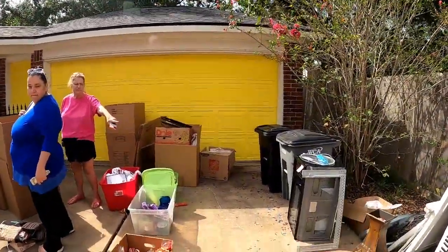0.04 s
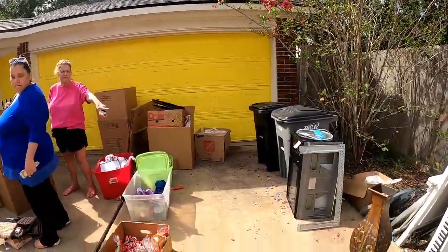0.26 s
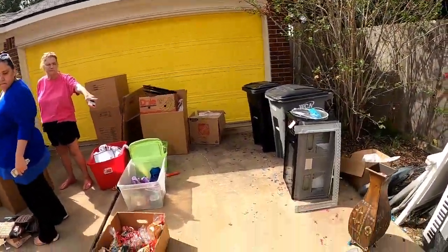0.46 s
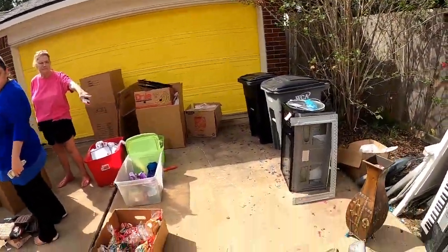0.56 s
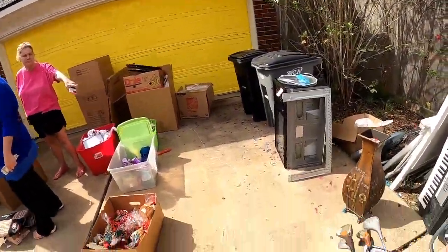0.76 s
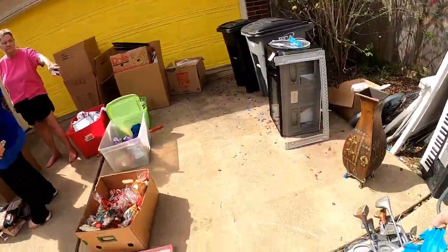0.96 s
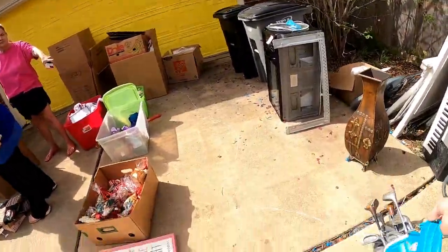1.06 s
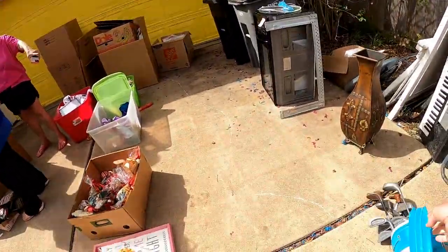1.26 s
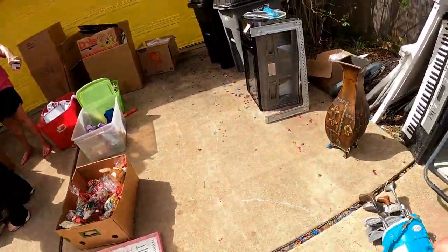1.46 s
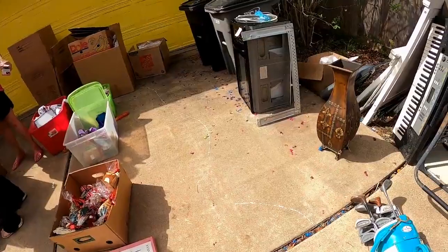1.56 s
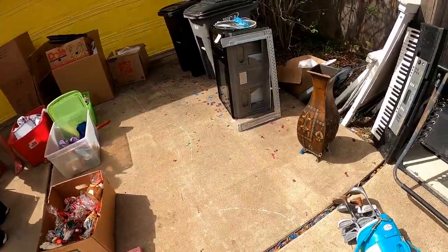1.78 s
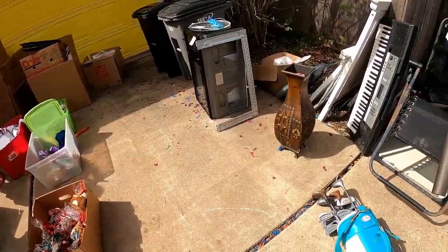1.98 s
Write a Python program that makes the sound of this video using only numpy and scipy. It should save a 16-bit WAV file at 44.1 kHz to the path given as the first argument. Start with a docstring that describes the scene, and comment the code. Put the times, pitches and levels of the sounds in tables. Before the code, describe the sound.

A bag of metal golf clubs is dragged and tipped onto concrete, close by and slightly right. First, shoes thud and scuff on grit around 0.2 and 0.7 seconds. From 0.8 seconds the bag scrapes and bumps with light clinks. At about 1.25 seconds it lands with hollow thumps and a loud, ringing clatter. The clubs rattle, knock again near 1.55 and settle by 1.7, over a quiet outdoor rumble.

```python
"""A golf bag full of metal clubs is dragged and tipped onto a concrete driveway, just to the right.
The bag scrapes along in tiny jerks, bumps, then lands with dull thumps that ring its hollow tube.
The clubs inside knock together, ring, rattle and settle. Shoes thud, scuff and snap bits of grit.
A garage and a fence give short echoes over a quiet outdoor rumble, faint hisses and a far-off hum."""
import sys
import numpy as np
from scipy import signal
from scipy.fft import rfft, irfft
from scipy.io import wavfile

SR = 44100
rng = np.random.default_rng(int(sys.argv[2]) if len(sys.argv) > 2 else 0)


def output_pcm(signal):
    """Save a mono or channel-first signal as 16-bit PCM at the path in sys.argv[1].

    Samples are clipped to [-1, 1] before scaling.
    """
    pcm = np.clip(np.atleast_2d(signal).T, -1, 1) * 32767
    wavfile.write(sys.argv[1], SR, np.round(pcm).astype(np.int16))


N = 89214

# How loudly the bag scrapes. Each row: time in seconds, level in dB.
DRAG_LEVELS = [(0, -35.5), (.05, -55.5), (.16, -45.5), (.28, -64), (.50, -64.5), (.55, -69), (.70, -67),
               (.73, -43.5), (.78, -41.5), (.87, -31.5), (.96, -27), (1.06, -25.5), (1.13, -27.5),
               (1.21, -28.5), (1.26, -33), (1.31, -24.5), (1.42, -33), (1.58, -32), (1.66, -45),
               (1.72, -61.5), (2.02, -68.5)]
# The bag's dull tone. Each row: frequency in Hz, level in dB.
BAG_TONE = [(30, -53.5), (70, 6), (130, 2.5), (280, 0), (450, 0.5), (800, -14), (1150, -11), (1600, -17.5),
            (2300, -32), (4000, -37), (7000, -47.5), (10000, -54), (15000, -73)]
# Bumps of the bag and the shafts inside. Each row: start in seconds, level in dB, pitch in Hz.
BAG_BUMPS = [(0.761, -22.5, 487), (0.79, -29, 526), (0.83, -22, 170), (.904, -14.5, 720), (.957, -14, 420),
             (0.973, -24.5, 230), (0.985, -18.5, 380), (1.018, -9, 330), (1.040, -9, 420), (1.051, -8, 150),
             (1.055, -14.5, 330), (1.073, -17.5, 240), (1.084, -13, 125), (1.097, -19.5, 400),
             (1.222, -8.5, 560), (1.23, -7, 290), (1.239, -6.5, 250), (1.243, -5, 115), (1.2577, -1.5, 285),
             (1.2648, -2.5, 310), (1.278, -14.5, 260), (1.284, -7, 330), (1.33, -14, 290),
             (1.335, -49, 200), (1.352, -19, 380), (1.405, -33.5, 480), (1.55, -19, 380), (1.568, -18, 680),
             (1.5703, -12.5, 405), (1.572, -15.5, 115.7), (1.586, -26.5, 260), (1.623, -30.5, 155),
             (1.861, -42, 242)]
# Notes of the hollow bag. Each row: pitch in Hz, width as a share of that pitch, level in dB.
BAG_NOTES = [(126, 0.067, -3.5), (220.4, 0.12, -9.5), (282.8, .08, -8.5), (454.4, 0.017, -16)]
# Fabric rasping on concrete. Each row: start in seconds, length in seconds, level in dB.
FABRIC_RASPS = [(0.803, .03, -51.5), (0.927, .025, -41), (1.042, .04, -47.5), (1.495, .03, -36)]
# The tone of that rasp. Each row: frequency in Hz, level in dB.
FABRIC_TONE = [(500, -8.5), (1500, 6), (4500, -7.5), (7000, -9.5), (10000, -9.5), (15000, -27)]

# Club heads and shafts knocking together. Each row: start in seconds, level in dB, pitch in Hz.
CLUB_CLACKS = [(.797, -46, 4100), (.8535, -30.5, 2710), (.8545, -31, 4590), (.876, -38.5, 2780),
               (.905, -34.5, 1150), (.931, -32.5, 1620), (.942, -33.5, 5000), (1.053, -34.5, 3660),
               (1.102, -38, 3070), (1.221, -19.5, 4330), (1.223, -16, 1020), (1.2265, -15.5, 2440),
               (1.230, -15.5, 1000), (1.238, -16, 1110), (1.243, -19.5, 4200), (1.247, -9, 3970),
               (1.2495, -23, 4280), (1.2525, -16.5, 4900), (1.258, -17, 4240), (1.263, -37, 2800),
               (1.270, -21, 3940), (1.278, -20.5, 4530), (1.292, -20, 4400), (1.305, -26, 4970),
               (1.312, -22.5, 3780), (1.327, -22, 2050), (1.329, -27, 1185), (1.332, -22, 3980),
               (1.338, -24, 3600), (1.371, -22.5, 3900), (1.405, -27, 1390), (1.437, -28.5, 3600),
               (1.470, -29, 3660), (1.479, -38.5, 8870), (1.4945, -21, 3620), (1.506, -45, 4600),
               (1.532, -36, 4150), (1.567, -29, 2750), (1.570, -25, 870), (1.597, -36, 4300),
               (1.650, -52.5, 2700), (1.653, -50.5, 8140), (1.719, -48.5, 9000)]
# The notes a struck club rings with. Each row: pitch in Hz, level in dB.
CLUB_NOTES = [(1018, 5), (1103, 0.5), (1242, -1.5), (1427, -5), (1569, -3), (2020, -18), (2692, -2),
              (2826, -9), (3435, -15), (3677, -1.5), (4080, -2.5), (4287, -16), (4405, -9), (5112, -4)]
# How loudly the loose clubs rattle. Each row: time in seconds, level in dB.
RATTLE_LEVELS = [(.75, -67), (.92, -52), (1.06, -47), (1.20, -48.5), (1.25, -25.5), (1.30, -33.5),
                 (1.37, -36), (1.45, -45.5), (1.51, -37.5), (1.56, -51), (1.62, -53), (1.70, -76),
                 (1.8, -80.5)]
# The tone of metal hitting metal. Each row: frequency in Hz, level in dB.
METAL_TONE = [(300, -4.5), (1000, 0), (1600, 2.5), (2200, -0.5), (3100, -4), (4000, -5), (5500, -8.5),
              (7000, -14.5), (9000, -19), (12000, -37), (15000, -45)]

# Heels landing. Each row: start in seconds, level in dB, pitch in Hz.
FOOTFALLS = [(.106, -31, 372), (.147, -28, 380), (0.1734, -16, 445), (0.7203, -20, 494)]
# The tone of a sole on concrete. Each row: frequency in Hz, level in dB.
SCUFF_TONE = [(150, -1), (500, 3), (1000, -3), (1900, -3), (2800, -9.5), (4500, -11), (6500, -18),
              (9000, -21.5), (15000, -45)]
# Grit snapping under shoes. Each row: start in seconds, level in dB, pitch in Hz.
GRIT_SNAPS = [(0.018, -33, 3404), (0.13, -42.5, 2340), (0.1731, -38, 3970), (0.1972, -24.5, 1800),
              (0.226, -39, 3300), (0.315, -51.5, 2000), (.484, -43.5, 1300), (0.717, -42, 1450),
              (0.743, -43, 3400), (1.847, -56, 1614)]
# The tone of crunching grit. Each row: frequency in Hz, level in dB.
CRUNCH_TONE = [(500, 3.5), (2000, 8.5), (6000, -15), (9000, -15.5), (15000, -34)]

# The tone of the yard's echoes. Each row: frequency in Hz, level in dB.
ECHO_TONE = [(40, -21), (250, -13.5), (600, 2.5), (1500, 9.5), (5000, 9), (12000, 5)]
# The tone of the outdoor rumble. Each row: frequency in Hz, level in dB.
RUMBLE_TONE = [(20, -7), (45, 0.5), (75, 4.5), (130, -3), (250, -15), (600, -25.5), (1300, -28),
               (3000, -65), (15000, -87)]
# The tone of the thin, airy noise above it. Each row: frequency in Hz, level in dB.
AIR_TONE = [(200, 9), (600, -1), (1300, -1), (2100, -6), (2700, -8), (4000, -22), (5300, -11), (8000, -19),
            (10000, -32.5), (15000, -41.5)]
# How the airy noise rises and falls against the rumble. Each row: time in seconds, change in dB.
AIR_CHANGES = [(0, 12.5), (.28, -1), (.5, 5), (.55, -2), (.7, -2), (1.7, 3), (1.85, -0.5), (2.02, -3)]
# How loud rumble and air are together. Each row: time in seconds, level in dB.
OUTDOOR_LEVELS = [(0, -47.5), (.5, -49.5), (1.0, -43.5), (1.7, -53.5), (2.02, -51.5)]
# Thin, distant hisses. Each row: start in seconds, length in seconds, level in dB, pitch in Hz.
FAR_HISSES = [(0, 0.18, -64, 5070), (0, 0.14, -71, 7540), (.32, 0.16, -67.5, 4900),
              (0.441, 0.1, -63.5, 5040), (0.789, 0.11, -57.5, 5800), (.80, 0.12, -58, 7300),
              (1.703, 0.19, -69.5, 7520)]

CLUB_FADE_S, CLUB_DETUNE = 0.11, 0.0031  # time to fade by 60 dB; tuning spread as a share of the pitch
LEFT_LAG_S, CLUB_LAG_SPREAD_S = 4.8e-5, 4e-5  # how late the left side hears; how that varies by club


def bag():
    """The bag scrapes along in small jerks; each bump shakes its contents and rings the hollow tube."""
    body = unit(colour(grains(1100, spread_db=3.76), BAG_TONE)) * swell(DRAG_LEVELS)
    for start, db, hz in BAG_BUMPS:
        shake = undb(-11) * colour(burst(decay_s=0.0071), BAG_TONE)
        add(body, start, undb(db) * (thump(hz, cycles=1.3) + shake))
    hollow = sum(undb(db) * band(body, hz, width) for hz, width, db in BAG_NOTES)
    out = undb(-1.5) * body + hollow
    for start, length, db in FABRIC_RASPS:
        n = int(length * SR)
        rasp = unit(colour(grains(4500, spread_db=4), FABRIC_TONE))[:n]
        add(out, start, undb(db) * rasp * np.linspace(1, 0, n))
    low_cut = signal.butter(2, 105, "high", fs=SR, output="sos")  # weakens bass below 105 Hz
    return signal.sosfilt(low_cut, out)


def club_clacks(crack_s=0.0018, ping_s=0.001):
    """Single knocks between clubs: a crack, a short ping and a ring of the notes near that pitch."""
    out, t = np.zeros(N), clock()[:SR // 5]
    for start, db, hz in CLUB_CLACKS:
        ping = undb(-4) * np.sin(2 * np.pi * hz * t) * np.exp(-t / ping_s)
        contact = snap(hz, width=0.3, decay_s=crack_s)
        crack = undb(-7.5) * colour(burst(crack_s), METAL_TONE)
        ring = undb(-26.5) * band(club_ring(scatter_db=-6.5), hz, width=0.8)
        add(out, start, undb(db) * (contact + ping + crack))
        add(out, start, undb(db) * ring)
    return out


def club_rattle(count=3):
    """Loose clubs chatter in light taps, each club with its own ring and direction."""
    out = 0
    for place in np.linspace(-1, 1, count):
        taps = grains(350, spread_db=1.33) * swell(RATTLE_LEVELS) / np.sqrt(count)
        ring = club_ring(scatter_db=3.5)
        ringing = signal.fftconvolve(taps, ring / np.linalg.norm(ring))[:N]  # every tap starts a ring
        chatter = colour(taps, METAL_TONE) + undb(-6.5) * ringing
        out = out + from_right(chatter, LEFT_LAG_S + place * CLUB_LAG_SPREAD_S)
    return out


def club_ring(scatter_db):
    """One club rings with many notes at once; each club is tuned and struck a little differently."""
    t = clock()[:SR // 2]
    ring = 0
    for hz, db in CLUB_NOTES:
        strength, tuning, phase = rng.standard_normal(3)
        pitch = hz * (1 + CLUB_DETUNE * tuning)
        ring = ring + undb(db + scatter_db * strength) * np.sin(2 * np.pi * (pitch * t + phase))
    return ring * fade(t, CLUB_FADE_S)


def shoes(slide_peak_s=0.1964, rise_s=0.013, fall_s=0.017):
    """One sole slides over the concrete, heels land and grit snaps."""
    t = clock() - slide_peak_s
    slide = np.exp(-np.where(t < 0, (t / rise_s) ** 2, t / fall_s))
    grit = grains(4500, spread_db=2.2)
    rasp = unit(colour(grit, SCUFF_TONE))
    rasp += undb(-15) * unit(band(grit, hz=2100, width=0.3, order=2))
    rasp += undb(-12.5) * unit(band(grit, hz=2910, width=0.06))
    out = undb(-33) * rasp * slide
    for start, db, hz in FOOTFALLS:
        scuff = undb(-20.5) * colour(burst(decay_s=0.014), SCUFF_TONE)
        add(out, start, undb(db) * (thump(hz, cycles=0.68) + scuff))
    for start, db, hz in GRIT_SNAPS:
        crack = snap(hz, width=0.26, decay_s=0.0012)
        crunch = undb(-3) * colour(burst(decay_s=0.002), CRUNCH_TONE)
        add(out, start, undb(db) * (crack + crunch))
    return out


def echoes(x, fade_s=0.13, build_s=0.0017):
    """Sound bounces back as many tiny echoes, different on the left and right."""
    t = clock()
    shape = fade(t, fade_s) * (1 - np.exp(-t / build_s))
    sides = []
    for _ in range(2):
        bounces = grains(4000, spread_db=2.2) * shape
        echo = signal.fftconvolve(x, bounces / np.linalg.norm(bounces))[:N]
        sides.append(colour(echo, ECHO_TONE))
    return np.array(sides)


def bass_echo(x):
    """Bass lingers between the garage and the fence."""
    tail = band(rng.standard_normal(N), hz=148.5, width=1.24, order=2) * fade(clock(), fade_s=0.52)
    return undb(-11) * np.std(x) * unit(signal.fftconvolve(x, tail)[:N])


def outdoors():
    """A low rumble shared by both sides, with thin air and fading hisses that differ left and right."""
    rumble = colour(rng.standard_normal(N), RUMBLE_TONE)
    sides = []
    for _ in range(2):
        air = undb(-14) * colour(rng.standard_normal(N), AIR_TONE) * swell(AIR_CHANGES)
        side = (rumble + air) * swell(OUTDOOR_LEVELS)
        for start, length, db, hz in FAR_HISSES:
            n = int(length * SR)
            shape = signal.windows.tukey(n, 0.6) * undb(np.linspace(3, -8, n))  # soft ends, falling level
            hiss = unit(band(rng.standard_normal(N), hz, width=0.15, order=2))[:n]
            add(side, start, undb(db) * hiss * shape)
        sides.append(side)
    return np.array(sides)


def far_hum(hz=645, db=-72):
    """A faint, far-off hum whose pitch wavers slightly."""
    waver = unit(band(rng.standard_normal(N), hz=20, width=0.92))
    pitch = hz * (1 + 0.004 * waver)
    return undb(db) * np.sin(2 * np.pi * np.cumsum(pitch) / SR)


def from_right(x, lag_s, shade_db=2.5, shade_hz=1390):
    """Sound from the right reaches the left side a little later and with less treble."""
    hz = np.arange(N + 1) * SR / (2 * N)
    spectrum = rfft(x, 2 * N)
    shade = undb(shade_db / 2 * hz ** 2 / (hz ** 2 + shade_hz ** 2))
    delay = np.exp(-2j * np.pi * hz * lag_s)
    left, right = spectrum / shade * delay, spectrum * shade
    return irfft(np.array([left, right]))[:, :N]


def thump(hz, cycles, attack_s=0.00035):
    """A dull knock that drops to about a third of its strength in the given number of cycles."""
    t = clock()[:SR // 5]
    return np.sin(2 * np.pi * hz * t) * np.exp(-t * hz / cycles) * (1 - np.exp(-t / attack_s))


def snap(hz, width, decay_s):
    """A hard contact: a crack of noise around one pitch, with a peak of 1."""
    crack = band(burst(decay_s), hz, width, order=2)
    return crack / np.abs(crack).max()


def burst(decay_s):
    """A short crack of noise."""
    t = clock()[:SR // 5]
    return rng.standard_normal(len(t)) * np.exp(-t / decay_s)


def grains(per_second, spread_db):
    """Tiny clicks of uneven size at random times."""
    hits = rng.random(N) < per_second / SR
    sizes = undb(spread_db * np.clip(rng.standard_normal(N), -2, 2))
    return unit(hits * rng.choice([-1, 1], N) * sizes)


def colour(x, tone):
    """Give x the tone in a table; white noise keeps its power."""
    hz, db = np.array(tone).T
    grid_hz = np.arange(2049) * SR / 4096
    gain = unit(undb(np.interp(np.log(grid_hz + 1), np.log(hz), db)))
    # Build the filter so that nothing sounds before the hit that causes it.
    cepstrum = irfft(np.log(gain))
    cepstrum[1:2048] *= 2
    cepstrum[2049:] = 0
    response = irfft(np.exp(rfft(cepstrum)))
    return signal.fftconvolve(x, response)[:len(x)]


def band(x, hz, width, order=1):
    """Keep the sound near one pitch; width is a share of that pitch."""
    edges = np.clip([hz / (1 + width / 2), hz * (1 + width / 2)], 10, SR / 2 - 10)
    return signal.sosfilt(signal.butter(order, edges, "band", fs=SR, output="sos"), x)


def fade(t, fade_s):
    """A volume curve that falls by 60 dB in fade_s seconds."""
    return np.exp(-np.log(1000) * t / fade_s)


def swell(levels):
    """A volume curve through rows of time in seconds and level in dB."""
    return undb(np.interp(clock(), *np.array(levels).T))


def add(out, start_s, x):
    """Mix x into out from the given time."""
    i = max(int(start_s * SR), 0)
    out[i:i + len(x)] += x[:N - i]


def undb(db):
    """Turn dB into a number to multiply by."""
    return 10 ** (np.asarray(db) / 20)


def unit(x):
    """Scale to an average strength (rms) of 1."""
    return x / np.sqrt(np.mean(x ** 2))


def clock():
    """The time of each sample in seconds."""
    return np.arange(N) / SR


def scene():
    """Bag, clubs and shoes in the open yard; the clatter also bounces off the ground and things nearby."""
    knocks = club_clacks()
    chatter = club_rattle()
    dull = bag() + shoes()
    clatter = knocks + chatter.mean(axis=0)
    direct = from_right(dull + knocks, LEFT_LAG_S) + chatter
    yard_echo = undb(-11) * echoes(dull + clatter)
    club_echo = undb(-8) * echoes(clatter)
    return direct + yard_echo + club_echo + bass_echo(dull) + outdoors() + far_hum()


def record(dry):
    """Cut away the highest treble, above 15800 Hz."""
    return signal.sosfilt(signal.ellip(8, 0.2, 70, 15800, fs=SR, output="sos"), dry)


dry = scene()
out = record(dry)
output_pcm(out)
```